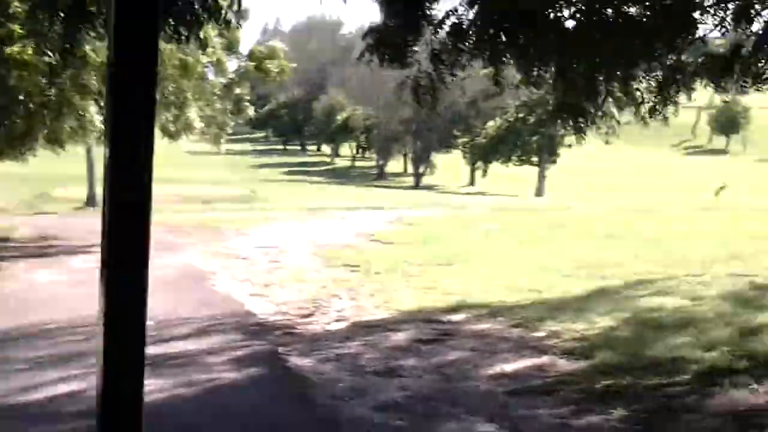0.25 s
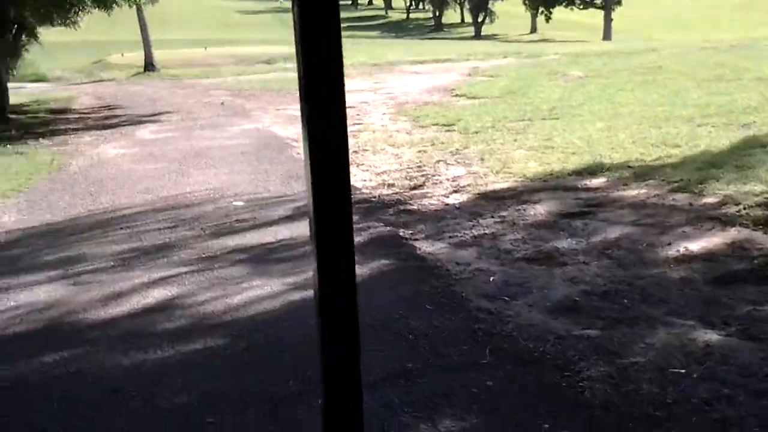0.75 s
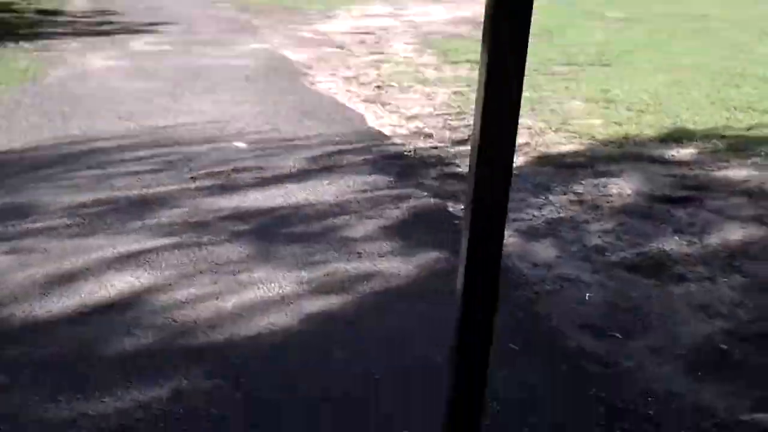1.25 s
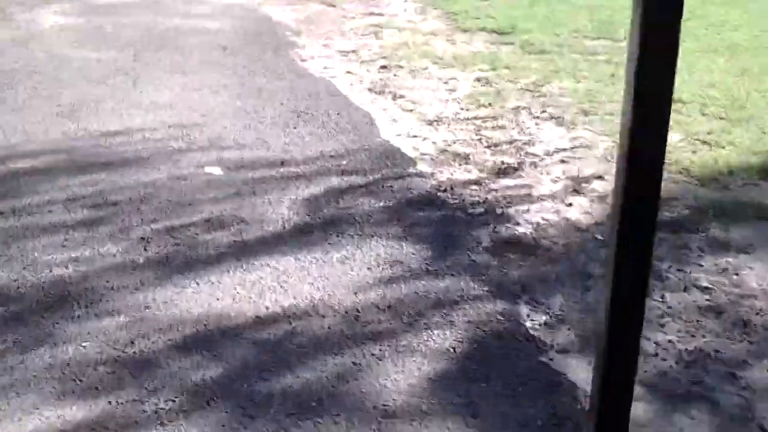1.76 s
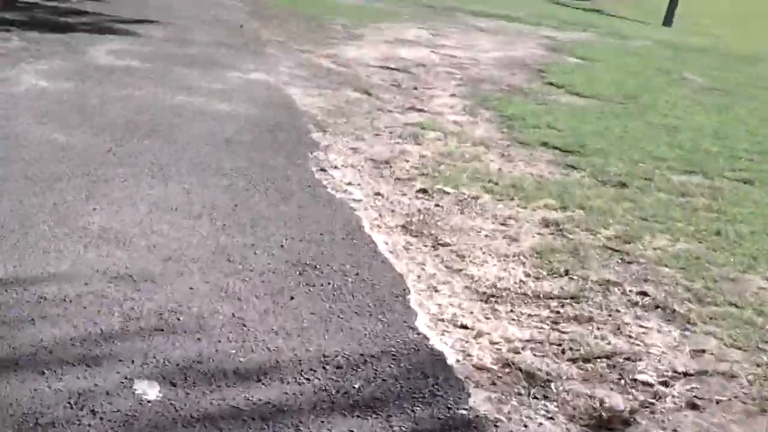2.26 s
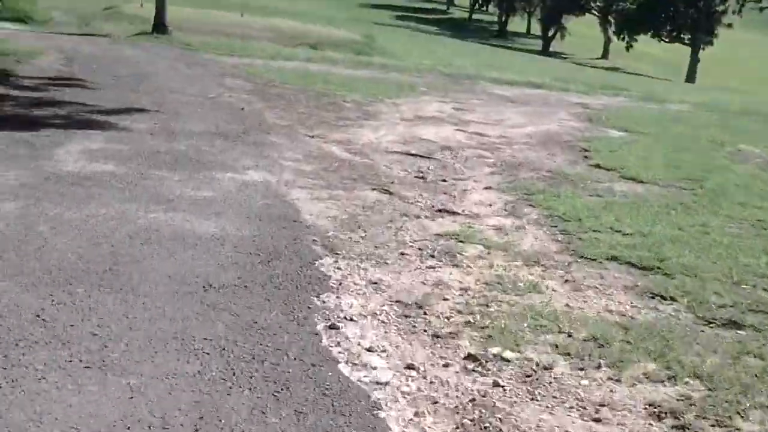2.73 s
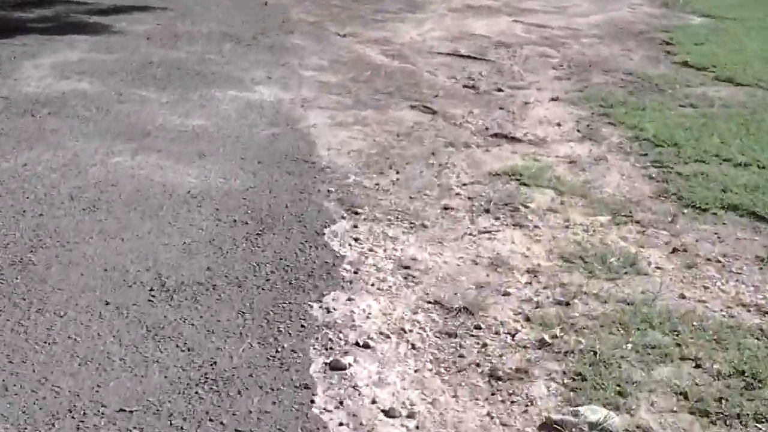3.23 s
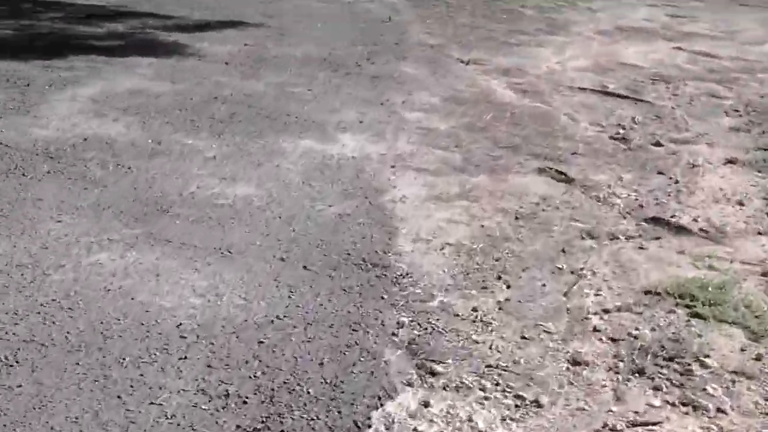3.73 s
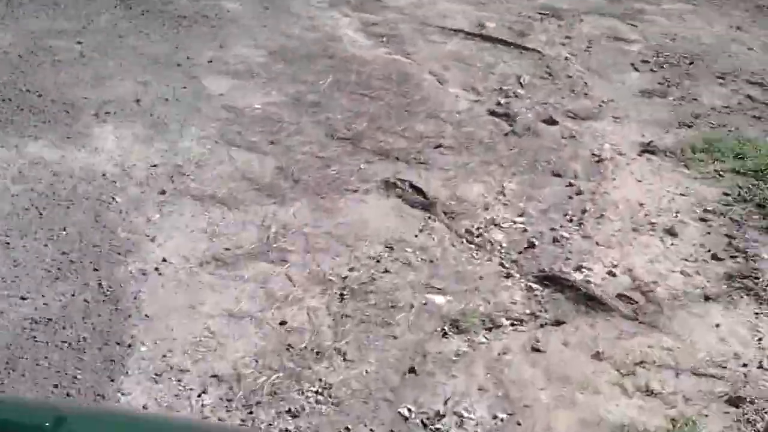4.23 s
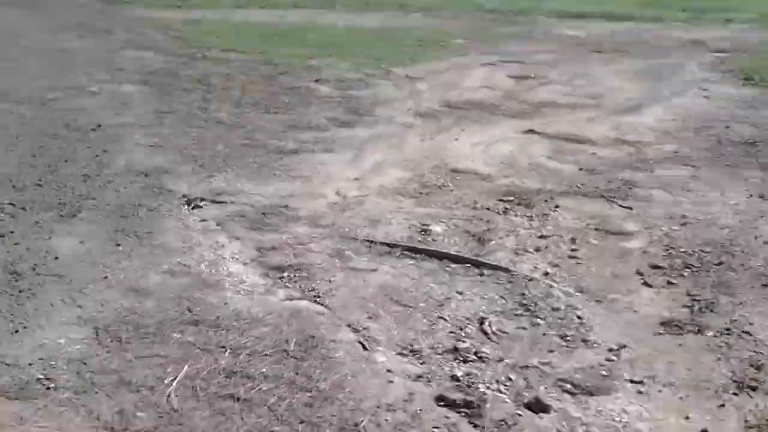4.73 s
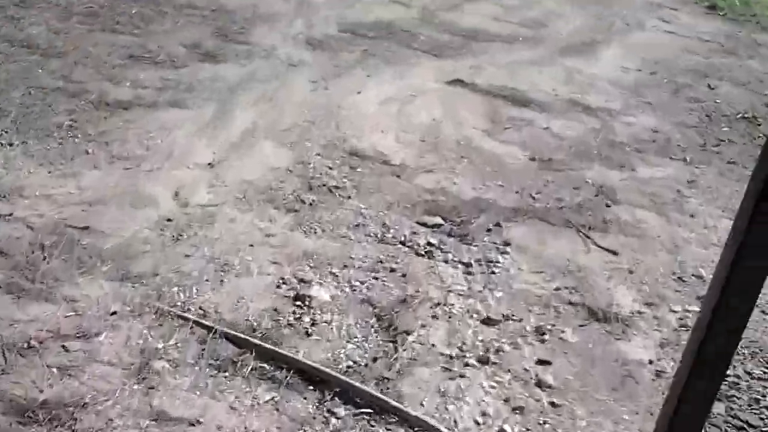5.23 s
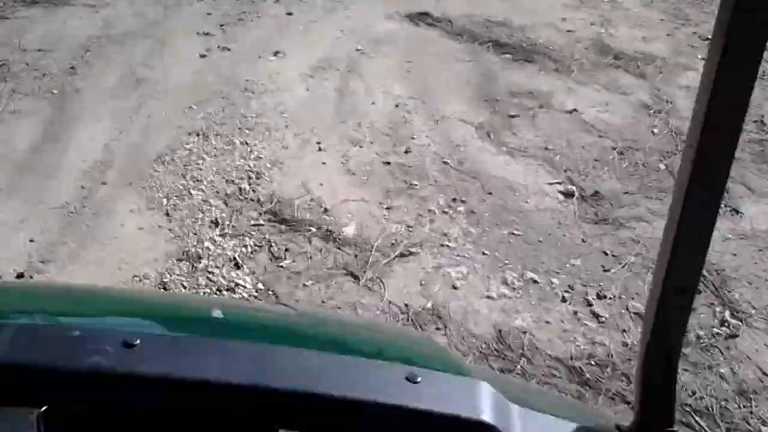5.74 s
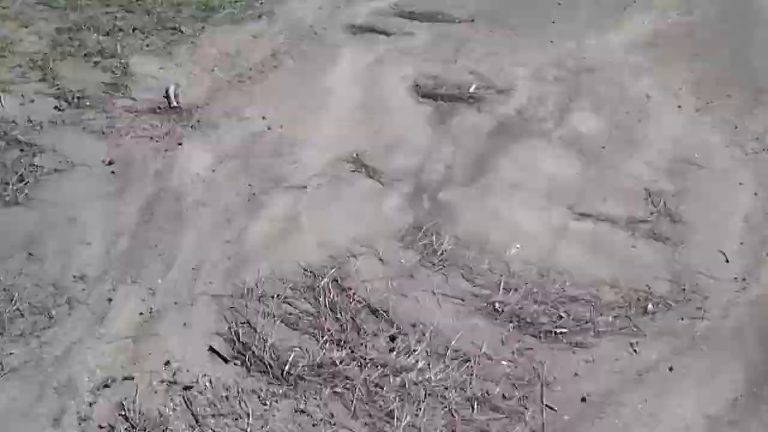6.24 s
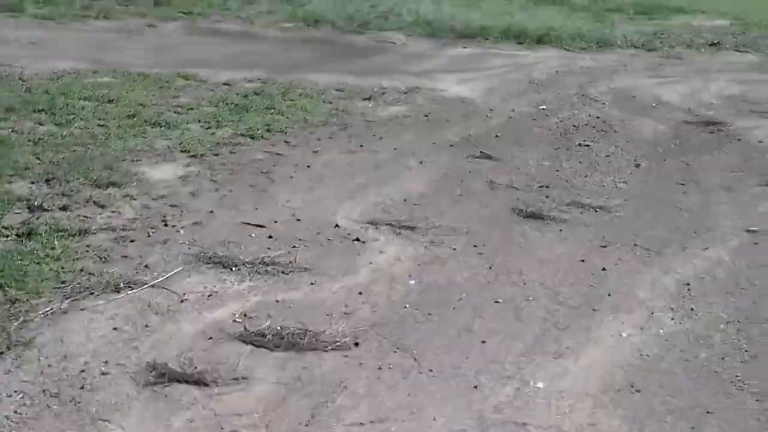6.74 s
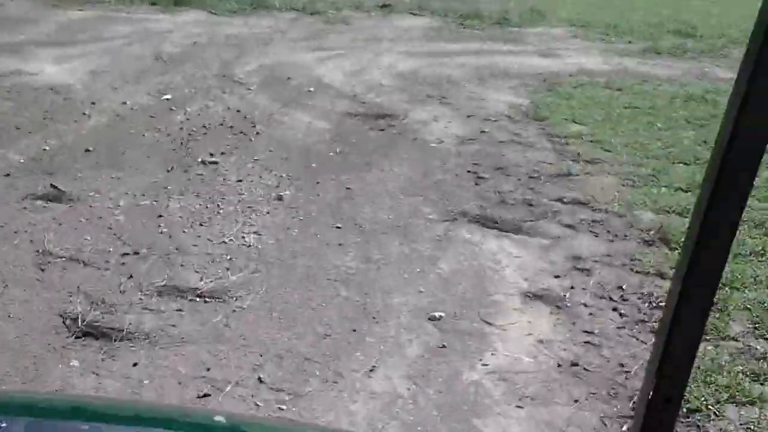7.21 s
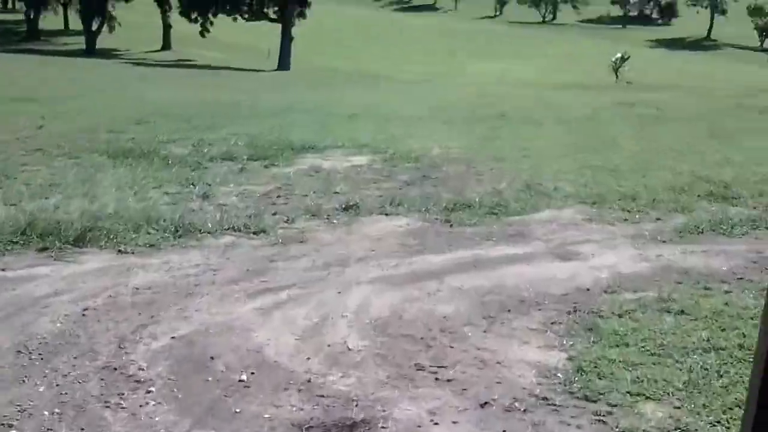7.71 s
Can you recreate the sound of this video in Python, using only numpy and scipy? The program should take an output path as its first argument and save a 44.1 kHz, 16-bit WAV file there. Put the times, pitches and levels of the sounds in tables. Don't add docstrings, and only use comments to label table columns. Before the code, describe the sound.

Heard from the seat, an electric cart rolls with wavering gear whine, body thumps and rattling metal on rough ground, with faint bird chirps late.

```python
import sys
import numpy as np
from scipy import signal
from scipy.fft import rfft, irfft, next_fast_len
from scipy.io import wavfile
from scipy.ndimage import uniform_filter1d, map_coordinates

SR = 44100
rng = np.random.default_rng(int(sys.argv[2]) if len(sys.argv) > 2 else 0)


def invert_db(level):
    return 10 ** (np.asarray(level, dtype=float) / 20)


def dump_mix(stems):
    frames = np.atleast_2d(stems).T
    limited = np.clip(frames, -1, 1)
    pcm = np.round(limited * 32767).astype(np.int16)
    wavfile.write(sys.argv[1], SR, pcm)


N = 351477

# time in seconds, angle in turns; rows evenly spaced.
SHAFT_TURNS = [(0.0, 0.27), (0.5, 8.81), (1.0, 17.76), (1.5, 27.64), (2.0, 37.54), (2.5, 46.68),
               (3.0, 54.94), (3.5, 62.79), (4.0, 71.01), (4.5, 79.84), (5.0, 88.91), (5.5, 98.39),
               (6.0, 107.48), (6.5, 116.95), (7.0, 126.29), (7.5, 135.63), (8.0, 144.89)]
# time in seconds, depth in dB.
SWISH_DEPTH = [(0.0, 2.6), (1.0, 1.0), (1.6, 1.8), (3.0, 5.6), (4.0, 3.2), (5.0, 3.2), (5.6, 1.5),
               (6.9, 3.8), (7.97, 2.6)]
# time in seconds, pitch in Hz, level in dB.
GEAR_MESH = [(0.1, 1300, -52), (.7, 1350, -34), (1.12, 1358, -27.5), (1.4, 1425, -32), (1.85, 1465, -31),
             (2.1, 1415, -33), (2.32, 1388, -28), (2.8, 1298, -31), (3.1, 1285, -33), (3.3, 1278, -52),
             (3.65, 1292, -31), (4.2, 1340, -33), (4.65, 1355, -45), (5.25, 1464, -35), (5.85, 1430, -42),
             (6.25, 1445, -32), (6.6, 1460, -46), (7.2, 1465, -32.5)]
# time in seconds, roughness in dB, loose grit in dB.
GROUND = [(0.0, -29, 2.1), (0.82, -27.5, 1.2), (1.28, -23.5, 2), (1.44, -23.5, 3.5), (1.66, -23.5, 1.3),
          (1.78, -25.5, 0.9), (2.13, -22.5, 0.4), (2.53, -27.5, 0.5), (2.95, -29, -0.6), (3.4, -27.5, -0.1),
          (4.02, -24.5, 0.4), (4.73, -24.5, 0.3), (5.59, -20.5, -0.2), (6.32, -22, -2.8), (6.46, -27, 1.5),
          (6.84, -28, 0.5), (7.1, -27.5, -0.7), (7.97, -25.5, 2.2)]
# time in seconds, peak in dB, pitch in Hz, length in ms.
HARD_BUMPS = [(1.303, -7.5, 587, 17), (1.476, -0.5, 484, 11.5), (1.701, -2.5, 560, 7.5),
              (1.728, -2.5, 453, 21), (1.748, -4, 446, 16), (1.763, 8.5, 541, 12.5), (1.771, 7.5, 517, 8.5),
              (1.811, -0.5, 462, 24), (2.02, 4.5, 513, 3.7), (2.074, 7, 347, 3.7), (2.113, 2, 392, 7.1),
              (2.212, -5, 290, 16), (4.15, -12.5, 460, 54), (4.92, -5.5, 395, 88), (5.055, -1.5, 342, 15.4),
              (5.395, -4, 425, 28), (5.575, -8, 425, 39), (5.702, 2, 312, 7), (5.726, -3, 360, 12),
              (5.736, 5.5, 425, 5), (5.757, 5.5, 835, 12.6), (5.765, 4.5, 644, 10.5), (5.938, 2.5, 351, 19),
              (6.15, -7.5, 904, 27), (6.31, -3, 353, 8), (7.682, -1.2, 300, 7.3), (7.725, -4.5, 426, 17),
              (7.808, 2.5, 415, 9.6), (7.834, -8.5, 361, 38), (7.865, -5, 276, 21)]
# time in seconds, peak in dB.
COMMON_PITCH_KNOCKS = [(1.045, -17), (1.272, -10.5), (1.322, -21), (1.371, -12), (1.564, -13.5), (1.405, -9),
                       (2.035, -8.5), (2.178, -17), (2.228, -15), (2.249, -8.5), (2.282, -19), (2.587, -16),
                       (3.626, -10.5), (3.804, -12), (3.956, -25), (4.59, -9.5), (4.964, -7), (5.064, -9),
                       (5.112, -6), (5.318, -5), (5.42, -26), (5.465, -19), (5.68, -10), (5.971, -14), (6.24, -14),
                       (6.336, -8), (6.374, -10.5), (6.499, -13.5), (7.64, -9.5), (7.792, -11)]
# start in seconds, peak in dB, own pitch in Hz, rod ring in dB.
METAL_CLANKS = [(3.5085, -5.5, 2950, -29), (3.6287, -10, 2225, -11), (3.7092, -5.5, 2920, -22),
                (4.125, -2, 3840, -47), (4.2218, -8, 2840, -17), (4.6082, -10, 2950, -11),
                (4.8544, -7, 4010, -24), (4.8826, -6.5, 2744, -13), (4.9402, -0.5, 3890, -14),
                (4.994, -5, 3630, -22), (5.1073, 3.5, 2080, -24), (5.3752, 3, 3970, -9),
                (5.469, -5, 2680, -31), (5.563, 0.5, 4150, -15.5), (5.676, -8, 3860, -10),
                (5.69, 2, 2580, -26), (5.7556, 1, 1980, -30), (5.767, -8.5, 4140, -20),
                (5.785, -1, 3570, -29), (6.1407, 5.5, 3795, -12), (6.4954, -3, 4050, -8),
                (7.1374, -16, 2260, -24), (7.3896, -7, 2223, -21), (7.6774, -4, 3040, -19)]
# pitch in Hz, level in dB, t60 in seconds.
ROD_MODES = [(1010, 4.5, 0.086), (2780, -2, 0.042), (4140, 0.5, 0.026), (5180, -3.5, 0.16),
             (6470, -4.5, 0.053)]
# start in seconds, peak in dB.
HARD_TICKS = [(0.578, -40), (1.7594, -40), (2.0717, -46), (3.4555, -38), (5.3677, -30), (5.4625, -41),
              (5.5648, -33), (5.6755, -28), (5.7553, -31), (6.1399, -29), (6.4946, -37.5), (7.1397, -38),
              (7.4131, -46), (7.6754, -36)]
# start in seconds, first pitch in Hz, last pitch in Hz, length in seconds, level in dB.
BIRD_CHIRPS = [
    (6.758, 7800, 5300, 0.073, -45),
    (6.936, 8300, 4590, .09, -40),
    (7.128, 8250, 4600, 0.089, -42),
]

# frequency in Hz, density in dB per Hz.
RUMBLE_SPECTRUM = [(18, -91), (30, -26.5), (167, -9), (298, -7.5), (361, -3.5), (425, -2), (616, -4.5),
                   (757, -14), (800, -9), (1040, -34.5), (1760, -120)]
TYRE_SPECTRUM = [(350, -22), (600, -11), (741, -1), (854, 2.5), (983, -3.5), (1280, -2), (2000, -8.5),
                 (2900, -11), (4400, -120)]
SWISH_SPECTRUM = [(900, -25), (1600, -19.5), (1900, -5.5), (2400, -3), (3300, -3), (4700, -5), (5500, -9),
                  (6000, -17), (8000, -21.5), (11000, -40), (16000, -87)]
HISS_SPECTRUM = [(3000, -29), (5500, -13.5), (6500, -6), (8000, -2.5), (9500, -1), (11500, -6.5),
                 (13000, -12), (16000, -24)]
CRUNCH_SPECTRUM = [(500, -20), (1000, -1), (2500, -3.5), (5000, -10.5), (7000, -19), (9500, -32),
                   (12000, -83)]
# frequency in Hz, density in dB per Hz.
CHANNEL_DIFFERENCE = [(120, -25), (200, -5.5), (517, -6), (650, -14), (1080, -5), (5110, -11), (10000, -25),
                      (13000, -53), (22000, -120)]
# frequency in Hz, threshold in dB.
TREBLE_THRESHOLD = [(7000, -120), (8000, -84), (8600, -73), (10000, -71.5), (11000, -69), (12500, -70.5),
                    (16000, -60)]
# centre in Hz, width in Hz, gain in dB.
TUB_MODES = [(388, 12, -23), (838, 54, -7.5), (169, 33, -5.5)]
PANEL_MODES = [(2930, 270, -5), (5200, 90, -3), (2330, 120, -10)]
SEAT_MODES = [(1530, 90, -7.5), (1083, 54, -4.5)]

TYRE_DB, TYRE_PER_ROUGH, TYRE_PER_GRIT = -31.5, 0.6, 1.1
SWISH_DB, SWISH_PER_ROUGH = -27.5, 0.58
TUB_DB, TUB_PER_ROUGH = -30, 0.6
TUB_JOLT_DB, TUB_RING_S = -4.5, 0.021
SHAKE_DB, SHAKE_S = -0.5, 0.027
DIRT_START_S, DIRT_DB = 4.5, 4
KNOCK_HZ, KNOCK_MS = 450, 17
TAPS, TAP_DB, TAP_SCATTER_DB = 30, -26, 6.5
OCTAVE_DB = -13.5


def unit(x):
    return x / np.sqrt(np.mean(x ** 2) + 1e-20)


def noise():
    return rng.standard_normal(N)


def curves(rows):
    time_s, *columns = np.transpose(rows)
    return [np.interp(np.arange(N) / SR, time_s, column) for column in columns]


def wobble(rate_hz):
    knots = rng.standard_normal(int(N * rate_hz / SR) + 4)
    return map_coordinates(knots, [np.arange(N) * rate_hz / SR])


def coloured(x, spectrum, modes=()):
    size = next_fast_len(N + 8192)
    hz = np.fft.rfftfreq(size, 1 / SR)
    knot_hz, knot_db = np.transpose(spectrum)
    gain = invert_db(np.interp(np.log(hz + 1), np.log(knot_hz + 1), knot_db))
    lift = 1
    for centre_hz, width_hz, gain_db in modes:
        lift = lift + invert_db(gain_db) / (1 + (2 * (hz - centre_hz) / width_hz) ** 2)
    return unit(irfft(rfft(x, size) * gain * lift, size)[:N])


def add(track, start_s, sound):
    part = track[max(round(start_s * SR), 0):][:len(sound)]
    part += sound[:len(part)]


def follow(x, hold_s):
    keep = np.exp(-1 / (hold_s * SR))
    return signal.lfilter([1 - keep], [1, -keep], abs(x))


def patchy(depth_db):
    z = signal.stft(rng.standard_normal(N + 512), nperseg=512)[2]
    field = uniform_filter1d(rng.standard_normal(z.shape), size=2, axis=0)
    field = uniform_filter1d(field, size=4, axis=1)
    return signal.istft(z * invert_db(depth_db * unit(field)), nperseg=512)[1][:N]


def rolling(turns, body):
    rough_db, grit_db = curves(GROUND)
    extra_db = rough_db - rough_db.mean()
    shake_db = 20 * np.log10(1 + invert_db(SHAKE_DB) * follow(body, SHAKE_S))
    rumble_db = rough_db + 2 * shake_db
    tyre_db = TYRE_DB + TYRE_PER_ROUGH * extra_db + TYRE_PER_GRIT * grit_db + shake_db
    swish_db = SWISH_DB + SWISH_PER_ROUGH * extra_db + grit_db + shake_db

    road = wobble(9)
    rumble_lumps = invert_db(1.3 * road + 0.96 * wobble(45))
    rumble = coloured(rumble_lumps * noise(), RUMBLE_SPECTRUM, TUB_MODES)
    tyre_lumps = invert_db(0.86 * road + 1.35 * wobble(40))
    tyres = coloured(tyre_lumps * noise(), TYRE_SPECTRUM, SEAT_MODES)

    depth_db, = curves(SWISH_DEPTH)
    angle = 2 * np.pi * (turns + 0.035)
    stroke = np.cos(angle) + 0.092 * np.cos(2 * angle + 3.1)
    air_db = -52 + 0.66 * (swish_db + 26) + 0.18 * depth_db * stroke
    air = invert_db(air_db) * coloured(noise(), HISS_SPECTRUM)
    grains = invert_db(0.61 * wobble(400))
    pulse_db = 0.78 * depth_db * stroke
    scrape = invert_db(pulse_db + 0.49 * wobble(30) + 0.76 * road) * grains * patchy(depth_db=2.0)
    swish = coloured(scrape, SWISH_SPECTRUM, PANEL_MODES)
    return air + invert_db(rumble_db - 0.5) * rumble + invert_db(tyre_db + 2.5) * tyres + invert_db(swish_db - 1.5) * swish


def gears(turns):
    hz, level_db = curves(GEAR_MESH)
    phase = 2 * np.pi * np.cumsum(hz + 10 * wobble(40)) / SR
    load = 2 * 2 * np.pi * turns
    tone = (1 + 0.17 * np.cos(load + 1.7)) * np.sin(phase + 0.14 * np.sin(load))
    rough = wobble(130) * np.sin(phase) + wobble(130) * np.cos(phase)
    rough_share = np.clip(0.5 + (hz - 1380) / 100, 0.4, 1.0)
    octave = wobble(190) * np.sin(2.08 * phase) + wobble(190) * np.cos(1.9 * phase)
    whine = unit(tone + rough_share * rough + invert_db(OCTAVE_DB) * octave)
    return invert_db(level_db + 1.2 * wobble(9.9) + 0.5) * whine


def knocks():
    body = np.zeros(N)
    t = np.arange(-SR // 40, SR // 22)[:, None] / SR
    ladder = np.linspace(-1.6, 1.6, num=10)
    taps = [(u * N / SR, TAP_DB + TAP_SCATTER_DB * rng.standard_normal()) for u in rng.random(TAPS)]
    light = [(s, db, KNOCK_HZ, KNOCK_MS) for s, db in [*COMMON_PITCH_KNOCKS, *taps]]
    blows = [*HARD_BUMPS, *light]
    luck = rng.standard_normal((len(blows), 3, len(ladder)))
    for (start_s, peak_db, hz, length_ms), (detune, size, phase) in zip(blows, luck):
        ratio = np.exp(0.555 * ladder + 0.078 * detune)
        width_s = (length_ms / 1000 + 0.00085) * ratio ** -0.3
        late_s = t + 0.00062 * ladder
        rise = (late_s / (0.32 * width_s)) ** 2
        decay = (abs(late_s) / (0.47 * width_s)) ** 0.73
        shape = np.exp(-np.where(late_s < 0, rise, decay))
        mode_gain = invert_db(3.5 * size - 4.0 * ladder ** 2)
        blow = (mode_gain * shape * np.cos(2 * np.pi * hz * ratio * t + 3 * phase)).sum(axis=1)
        blow /= np.sqrt(np.sum(blow ** 2) / np.sum(shape[:, 4] ** 2))
        add(body, start_s + t[0, 0], invert_db(peak_db - 5.5) * blow)
    return body


def tub(body):
    rough_db, _ = curves(GROUND)
    dirt_db = DIRT_DB * np.clip(np.arange(N) / SR - DIRT_START_S, -0.5, 0.5) * 2
    hum_db = TUB_DB + dirt_db + TUB_PER_ROUGH * (rough_db - rough_db.mean()) + 1.9 * wobble(9.7)
    jolts = invert_db(TUB_JOLT_DB + 0.5 * dirt_db) * follow(body, TUB_RING_S)
    hum = coloured(noise(), [(200, -83), (345, -23), (388, -6), (435, -24.5), (700, -83)])
    return invert_db(-6.5) * (invert_db(hum_db) + jolts) * hum


def clanks():
    metal = np.zeros(N)
    t = np.arange(SR // 7) / SR
    crunch = coloured(invert_db(2.5 * wobble(550)) * noise(), CRUNCH_SPECTRUM)
    for start_s, peak_db, own_hz, rod_db in METAL_CLANKS:
        drift = np.cumsum(rng.standard_normal((2, len(t))), axis=1)
        rod = np.zeros(len(t))
        for hz, level_db, t60_s in ROD_MODES:
            ring = invert_db(level_db + rng.normal(0, 1.5) - 60 * t / t60_s)
            rod += ring * np.sin(2 * np.pi * hz * t + 0.03 * drift[0])
        own = invert_db(-60 * t / 0.06) * np.sin(2 * np.pi * own_hz * t + 0.2 * drift[1])
        chatter = np.resize(crunch[round(start_s * SR):], len(t)) * invert_db(-5 - 60 * t / 0.065)
        onset = 1 - np.exp(-t / 0.0011)
        add(metal, start_s, invert_db(peak_db - 13.0) * (invert_db(rod_db + 5) * rod + own + chatter) * onset)
    return signal.sosfilt(signal.butter(5, 8800, fs=SR, output="sos"), metal)


def ticks():
    grit = np.zeros(N)
    t = np.arange(SR // 40) / SR
    for start_s, peak_db in HARD_TICKS:
        add(grit, start_s, invert_db(peak_db + 2.5 - 60 * t / 0.06) * rng.standard_normal(len(t)))
    return signal.sosfilt(signal.butter(2, [8500, 13500], "band", fs=SR, output="sos"), grit)


def bird():
    song = np.zeros(N)
    for start_s, first_hz, last_hz, length_s, level_db in BIRD_CHIRPS:
        u = np.linspace(0, 1, round(length_s * SR))
        hz = first_hz + (last_hz - first_hz) * u ** 1.2
        whistle = np.sin(2 * np.pi * np.cumsum(hz) / SR)
        add(song, start_s, invert_db(level_db) * np.sin(np.pi * u) ** 0.5 * whistle)
    return song


def thinned_treble(x):
    hz, _, z = signal.stft(x, SR, nperseg=2048, noverlap=1024)
    band = np.arange(len(hz)) // 3
    power = np.add.reduceat(abs(z) ** 2, np.arange(0, len(hz), 3)) / 3
    knot_hz, knot_db = np.transpose(TREBLE_THRESHOLD)
    mood_db = 3.4 * rng.standard_normal(power.shape) + 2.1 * rng.standard_normal(power.shape[1])
    threshold_db = np.interp(hz, knot_hz, knot_db)[:, None] + mood_db[band]
    keep = (power[band] > invert_db(2 * threshold_db)) | (hz < 7000)[:, None]
    thin = signal.istft(z * keep, SR, nperseg=2048, noverlap=1024)[1][:N]

    top = signal.sosfilt(signal.butter(6, [12000, 15000], "band", fs=SR, output="sos"), x)
    loud_top = uniform_filter1d(abs(top), size=130) > invert_db(-53)
    attack = uniform_filter1d(1.0 * loud_top, size=90)
    return thin + attack * signal.sosfilt(signal.butter(4, 14000, fs=SR, output="sos"), x - thin)


def scene():
    row_s = SHAFT_TURNS[1][0]
    turns = map_coordinates(np.transpose(SHAFT_TURNS)[1], [np.arange(N) / SR / row_s], mode="nearest")
    body = knocks()
    mono = rolling(turns, body) + gears(turns) + body + tub(body) + clanks() + ticks() + bird()
    return np.array([mono, mono])


def low_pass(x):
    return signal.sosfilt(signal.butter(12, 15650, fs=SR, output="sos"), x)


def record(dry):
    x = signal.sosfilt(signal.butter(2, 110, "high", fs=SR, output="sos"), dry[0])
    overloaded = x / (1 + np.abs(x / 1.01) ** 14) ** (1 / 14)
    x = thinned_treble(overloaded)
    side = invert_db(-53) * coloured(noise(), CHANNEL_DIFFERENCE) * (wobble(30) > 1.9)
    mix = np.clip([x + side, x - side], -0.995, 0.995)
    return low_pass(mix)


dry = scene()
out = record(dry)
dump_mix(out)
```